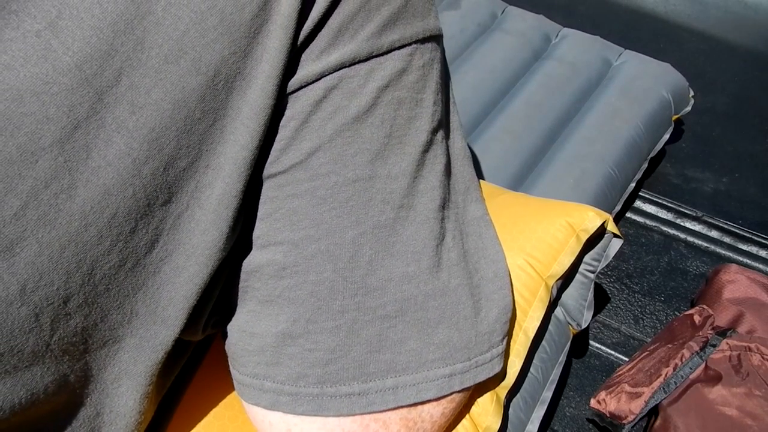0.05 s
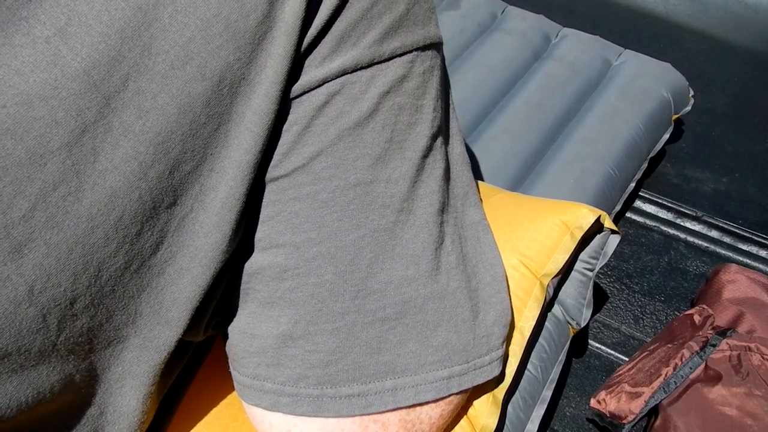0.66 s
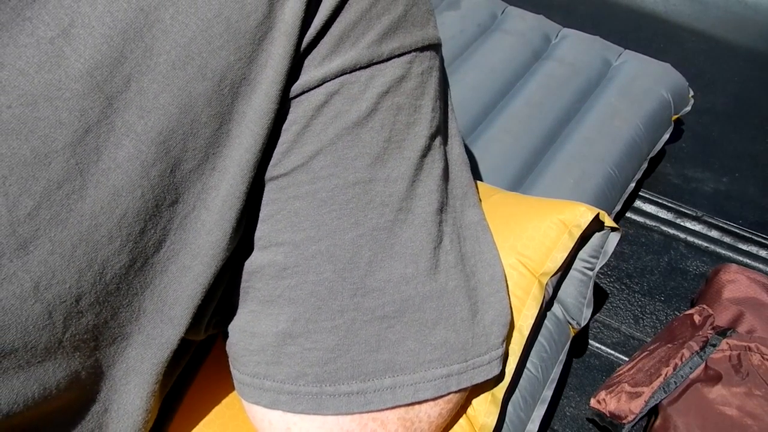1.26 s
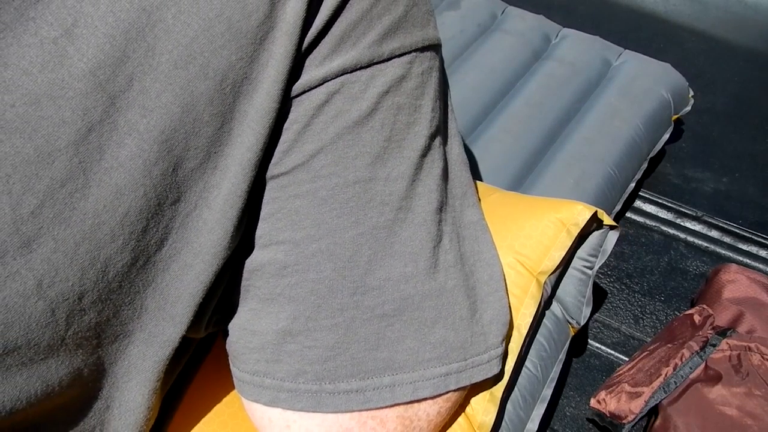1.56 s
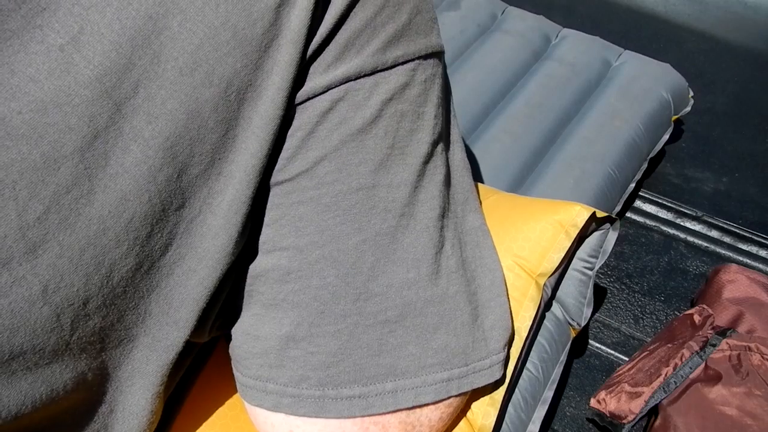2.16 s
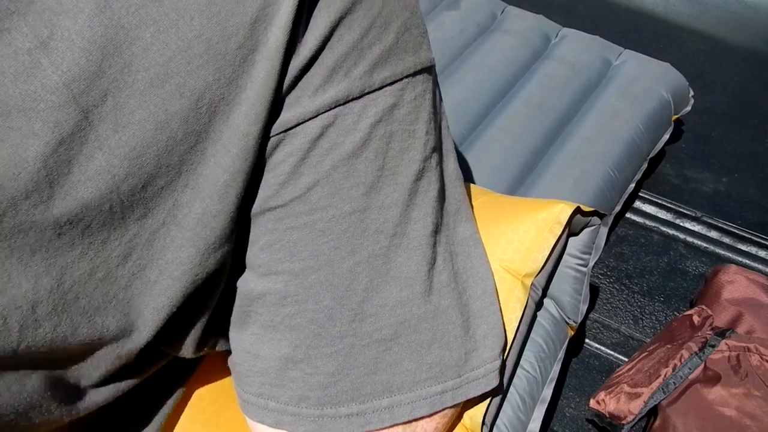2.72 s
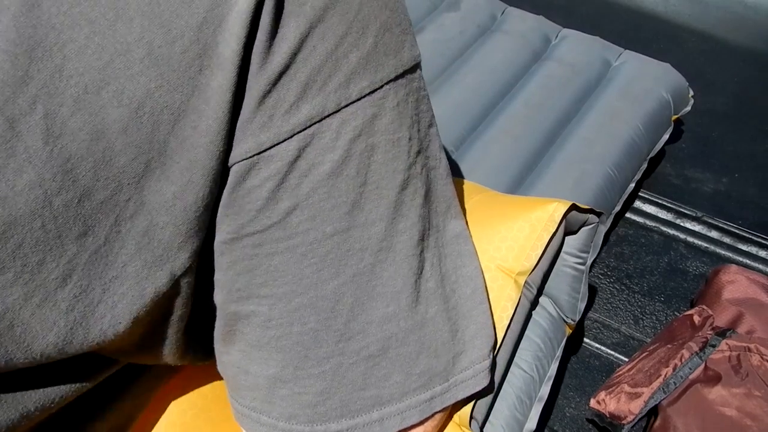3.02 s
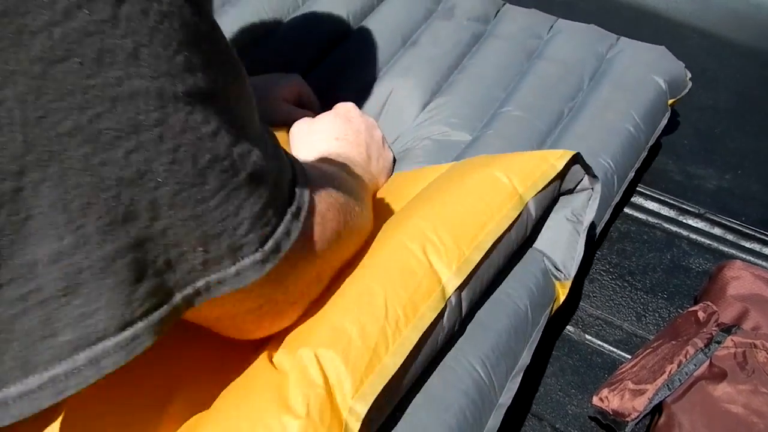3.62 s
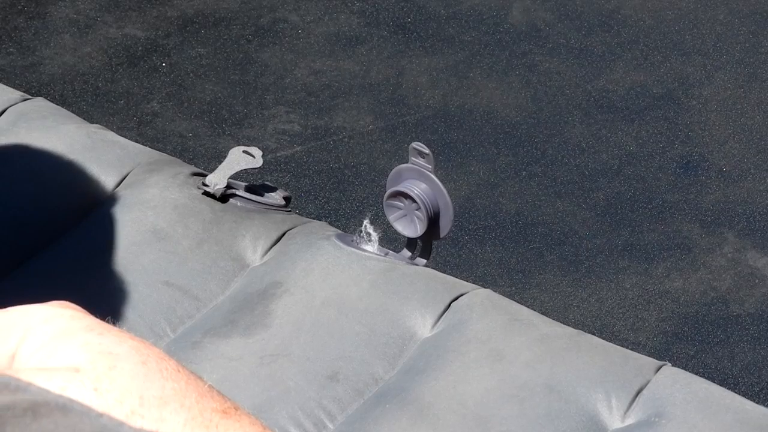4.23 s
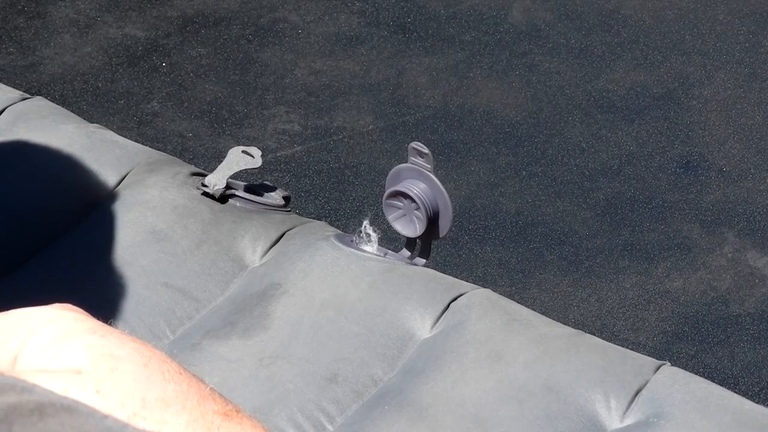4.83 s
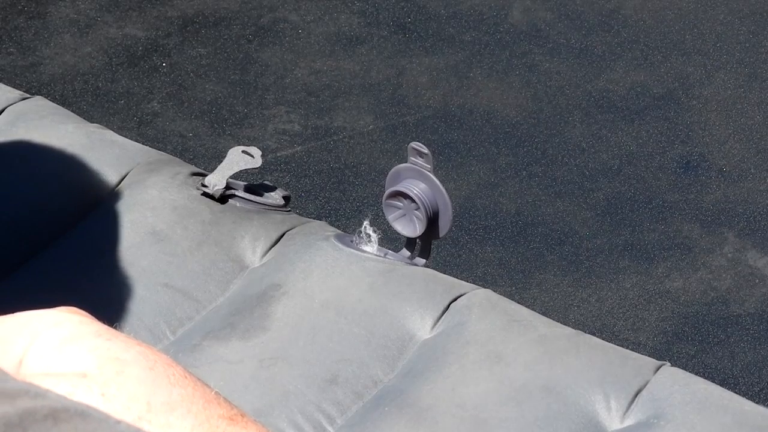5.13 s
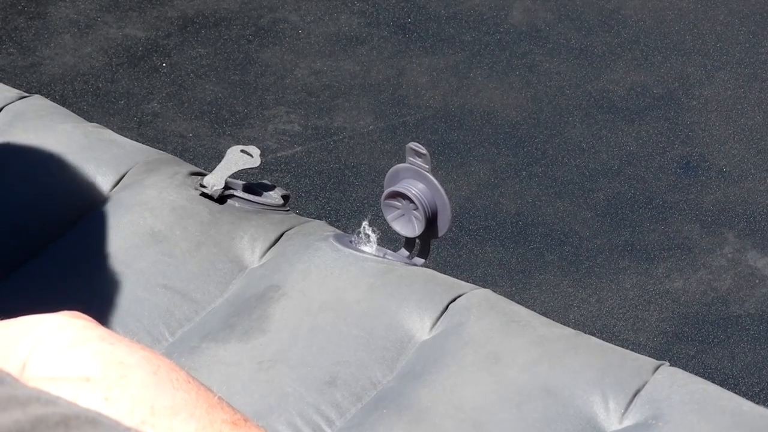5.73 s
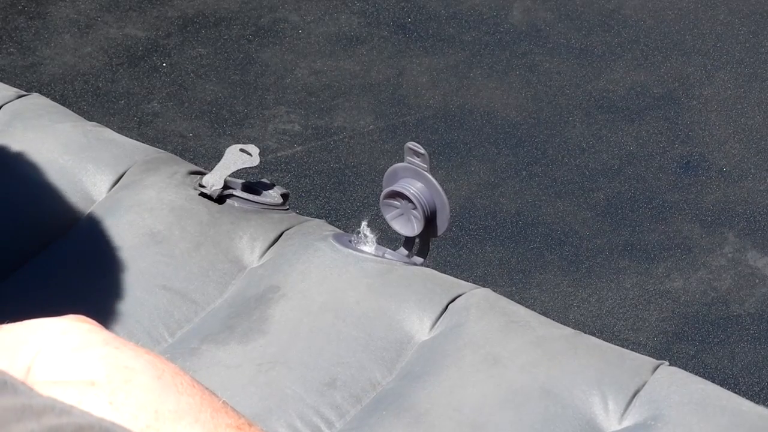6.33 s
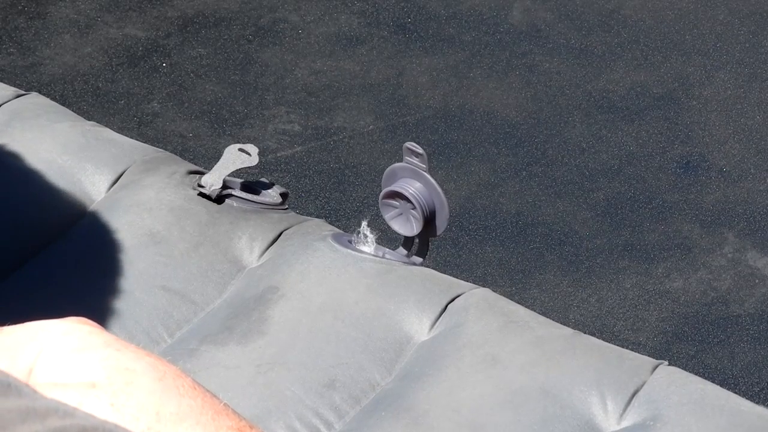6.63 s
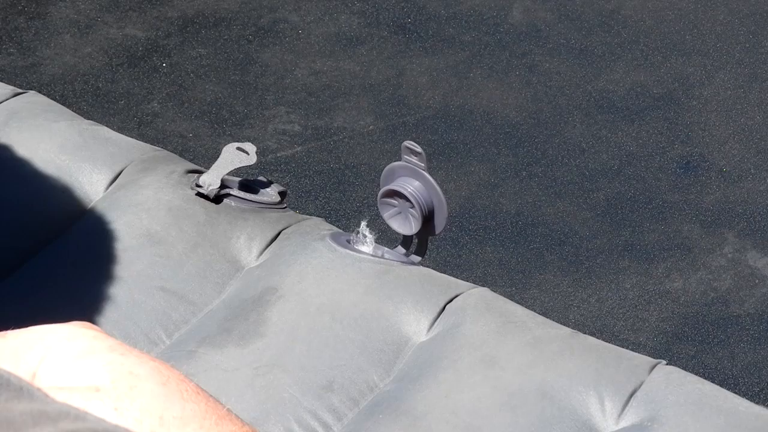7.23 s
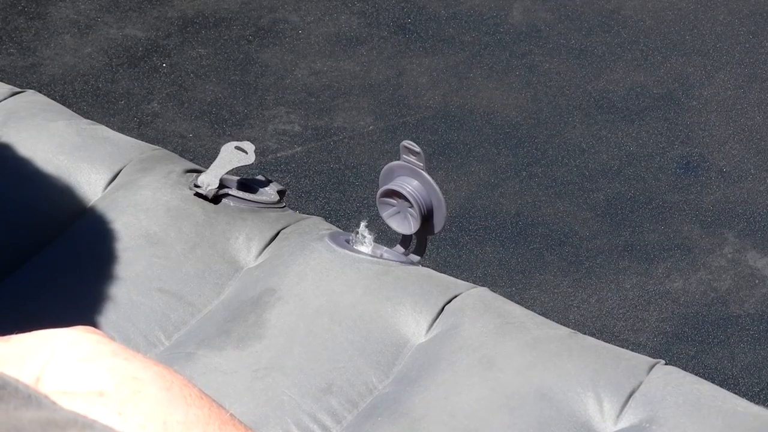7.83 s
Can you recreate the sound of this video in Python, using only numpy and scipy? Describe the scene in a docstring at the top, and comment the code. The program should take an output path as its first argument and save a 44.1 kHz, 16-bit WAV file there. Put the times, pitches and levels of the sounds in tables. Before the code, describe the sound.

Heard from behind a person leaning on a sleeping pad in an open truck bed, escaping air makes a bright hiss above a low rumble. Clothing rubs and several knocks land on the taut pad as the weight lifts and the hiss falls away. The sound cuts out briefly, then resumes close to the valve: a slowly fading rush of air with a faint breathy whistle and occasional soft thumps.

```python
"""Air hisses from the open valve of a sleeping pad that someone leans on in a truck bed.
Folds give way softly and the pad booms briefly over a low outdoor rumble. The person shifts:
cloth rubs, the nylon skin crackles, the pad is knocked, and the hiss drops as the weight lifts.
After a short silence the turbulent jet is heard from beside the valve, with a faint whistle
at the rim, weakening as the pad empties."""
import sys
import numpy as np
from scipy import signal
from scipy.fft import rfft, irfft
from scipy.io import wavfile
from scipy.ndimage import uniform_filter1d

SR = 44100
rng = np.random.default_rng(int(sys.argv[2]) if len(sys.argv) > 2 else 0)


def store_pcm(level_fs):
    """Save levels as 16-bit WAV."""
    pcm = np.round(np.clip(level_fs, -1, 1) * 32767).astype(np.int16)
    wavfile.write(sys.argv[1], SR, np.atleast_2d(pcm).T)


N = 351477
TIME = np.arange(N) / SR
HZ = np.fft.rfftfreq(N, 1 / SR)
GAP_START_S, GAP_END_S = 3.885, 4.065

# spectrum of the rubs and thumps, with a boxy ring near 400 Hz: (frequency [Hz], relative level [dB])
RUB_THUMP_COLOUR = [(29, -49), (50, -19), (147, -9), (282, -15.5), (360, -3.5), (440, -1.5), (814, -10.5),
                    (1950, -12.5), (3830, -21), (4410, -21), (4790, -24.5), (5990, -30.5), (6500, -28),
                    (8450, -62), (14300, -120)]


def gain_of(db):
    """Decibels to amplitude."""
    return 10 ** (np.asarray(db) / 20)


def unit_rms(x):
    """Scale to unit rms."""
    return x / np.sqrt(np.mean(x ** 2) + 1e-20)


def curve(points, hz=HZ):
    """Interpolate on a log-frequency axis."""
    f, value = np.transpose(points)
    return np.interp(np.log(hz + 1), np.log(f + 1), value)


def add(mix, start_s, sound):
    """Mix a sound in at start_s."""
    part = mix[..., max(round(start_s * SR), 0):][..., :sound.shape[-1]]
    part += sound[..., :part.shape[-1]]


def ramp(start_s, length_s):
    """Smooth step from 0 to 1."""
    return np.sin(np.pi / 2 * np.clip((TIME - start_s) / length_s, 0, 1)) ** 2


def bump(centre_s, half_s):
    """Gaussian swell to 1 and back."""
    return np.exp(-((TIME - centre_s) / half_s) ** 2)


def wander(rate_hz):
    """Low-passed random motion, unit rms."""
    return unit_rms(irfft(rfft(rng.standard_normal(N)) / (1 + (HZ / rate_hz) ** 2), N))


def noise_pair(coherence):
    """Left and right spectra of partly coherent noise."""
    a, b = rfft(rng.standard_normal((2, N)))
    shared, apart = np.sqrt((1 + coherence) / 2) * a, np.sqrt((1 - coherence) / 2) * b
    return np.array([shared + apart, shared - apart])


def truck_bed(wall_s, wall_db, ribs_db, ribs_decay_s):
    """Frequency response of the bed: a side-wall echo and scatter from the ribs comb the hiss."""
    late_s = TIME - wall_s
    scatter = rng.standard_normal(N) * np.exp(-abs(late_s) / ribs_decay_s) * (late_s > 0)
    wall = gain_of(wall_db) * np.exp(-2j * np.pi * HZ * wall_s)
    return 1 + wall + gain_of(ribs_db) * rfft(scatter / np.linalg.norm(scatter))


def eddies(hiss, depth_db=1.13, size=1024):
    """Eddies swell and fade patches of the hiss a few hundred hertz wide."""
    frames = signal.stft(hiss, nperseg=size)[2]
    patches = uniform_filter1d(rng.standard_normal(frames.shape[1:]), size=11, axis=1)
    patches = uniform_filter1d(patches, size=7, axis=0)
    return signal.istft(frames * gain_of(depth_db * unit_rms(patches)), nperseg=size)[1][:, :N]


def jet(level_db, colour, rings, coherence, balance, bed, brightening, flutter_db, level_above_hz):
    """Turbulence at the valve; the treble follows the flow more steeply than the body does."""
    # phase between channels: (frequency [Hz], left lead [rad])
    lead = [(3500, 0.64), (5000, 0.18), (6300, 0.67), (6800, -0.51), (8500, -1.7), (10500, -0.89),
            (11800, -.8), (12700, .4), (13800, 0)]
    side = np.array([[.5], [-.5]])
    spectrum = noise_pair(curve(coherence)) * gain_of(side * curve(balance))
    spectrum *= np.exp(1j * side * curve(lead) * (HZ > lead[0][0]))
    spectrum /= np.sqrt(uniform_filter1d(abs(spectrum.mean(0)) ** 2, size=2001))  # flatten the mid
    rings_db = sum(db / (1 + (2 * (HZ - hz) / width_hz) ** 2) for hz, width_hz, db in rings)
    spectrum *= bed * gain_of(curve(colour) + rings_db)
    spectrum /= np.std(irfft(spectrum.mean(0) * (HZ > level_above_hz), N))
    highpass = 1 / (1 + (5000 / (HZ + 1)) ** 4)
    body_db = brightening * (-32.5 - level_db)  # no tilt at -32.5 dB
    body = irfft(spectrum * (1 - highpass), N) * gain_of(body_db + flutter_db * wander(25))
    fizz = irfft(spectrum * highpass, N) * gain_of(flutter_db * wander(40))
    return eddies((body + fizz) * gain_of(level_db))


def jet_behind():
    """Jet from behind the person: surges as they push off, drops as their weight lifts."""
    # hiss spectrum: (frequency [Hz], relative level [dB])
    colour = [(350, -63), (600, -15), (1470, -15.5), (1700, -10), (1960, -11.5), (2120, -9), (2400, -12),
              (3780, -11.5), (4220, -13), (5480, -8.5), (7110, -13.5), (9760, -2.5), (11800, -11.5),
              (13600, -13), (16000, -25)]
    # resonances: (frequency [Hz], width [Hz], gain [dB])
    rings = [(2650, 280, 3), (5400, 100, 3.5), (9560, 300, 1.5)]
    # channel likeness: (frequency [Hz], coherence [0-1])
    coherence = [(600, 0.64), (2800, 1), (3600, 0.98), (4000, 0.48), (5200, .72), (6700, .2), (8000, 0.27),
                 (9600, .72), (11500, .55), (12300, .4), (14400, 0.46), (15400, .8)]
    # channel balance: (frequency [Hz], left minus right [dB])
    balance = [(1000, -.3), (3200, -0.7), (4000, -1.5), (5400, 0), (6600, -7.5), (8200, -2.5), (9700, -4.5),
               (10700, 2), (12100, 1.5), (13100, 2), (14800, -2.5)]
    push_db, lift_db = 1.8 * bump(2.88, .1), -14 * ramp(3.093, .2)
    fade_db = -120 * (np.clip(TIME, 3.79, GAP_END_S) - 3.79)  # fades out just before the short silence
    bed = truck_bed(wall_s=.00923, wall_db=-19, ribs_db=-13.5, ribs_decay_s=.0019)
    return jet(-28 + push_db + lift_db + fade_db, colour, rings, coherence, balance, bed,
               brightening=.32, flutter_db=.46, level_above_hz=8350)


def rumble(start_db=-46, ease_db_per_s=.4, lumps_db=2):
    """Lumpy outdoor rumble, slowly easing, less coherent in the deep bass."""
    # rumble spectrum: (frequency [Hz], relative level [dB])
    colour = [(15, -47), (25, -15.5), (49, -14.5), (70, -10), (102, -1.5), (140, -9), (185, -7.5),
              (244, -13.5), (275, -10), (307, -13.5), (347, -2.5), (432, -1.5), (475, -3.5), (650, -12),
              (840, -38.5), (1430, -120)]
    coherence = curve([(30, .35), (100, .55), (400, .63)])
    noise = irfft(noise_pair(coherence) * gain_of(curve(colour)), N)
    return unit_rms(noise) * gain_of(start_db - ease_db_per_s * TIME + lumps_db * wander(16))


def thumps(events, crumple_s, bass_db_per_oct, push_db, tail_db, tail_s, muffle_hz, size=4096):
    """Each crumple swells to a push and dies with a boxy ring."""
    mix = np.zeros((2, N))
    t, hz = np.arange(size) / SR, abs(np.fft.fftfreq(size, 1 / SR))
    octave = np.log2((hz + 20) / 500)
    swell = t / crumple_s * np.exp(-t / crumple_s)
    push = gain_of(push_db) * (swell == swell.max())
    for start_s, db, treble_db_per_oct in events:
        grit, mid, side = rng.standard_normal((3, size))
        crumple = grit * swell
        tail = np.array([mid + .17 * side, mid - .17 * side]) * np.exp(-t / tail_s)
        tail *= gain_of(tail_db) / np.linalg.norm(tail[0])
        force = crumple / np.linalg.norm(crumple) + push + tail
        tilt_db = treble_db_per_oct * np.clip(octave, 0, 3) + bass_db_per_oct * np.clip(-octave, 0, 2.5)
        colour = gain_of(np.maximum(curve(RUB_THUMP_COLOUR, hz) + tilt_db, -90))
        colour /= np.sqrt(1 + (hz / muffle_hz) ** 6)
        ring = np.fft.fft(force) * np.exp(np.conj(signal.hilbert(np.log(colour))))  # minimum phase
        midband = np.fft.ifft(ring[0] * (hz > 250) * (hz < 3000))
        midband_rms = np.linalg.norm(midband) / np.sqrt(.0035 * SR)  # as if packed into 3.5 ms
        add(mix, start_s, gain_of(db) * np.fft.ifft(ring).real / midband_rms)
    return mix


def folds():
    """Folds of the pad give way softly."""
    # folds: (time [s], level [dB], treble tilt [dB/octave])
    events = [(.133, -26, -9), (.237, -31.5, -1), (.457, -32.5, 1.5), (.651, -31, -.5), (.845, -32, -5),
              (1.041, -29.5, -2.5), (1.314, -31.5, -4), (1.475, -30.3, -4), (1.566, -32, -4),
              (2.312, -29, -9), (2.892, -24.5, 0), (2.923, -22.5, 4), (4.432, -25.5, -7), (4.682, -32, -8),
              (4.942, -24.5, -1.5), (4.972, -32, -4), (5.714, -26, 2), (6.802, -27.5, 2),
              (7.372, -31.5, -4)]
    return thumps(events, crumple_s=.00395, bass_db_per_oct=1.3, push_db=-8,
                  tail_db=-6.5, tail_s=.037, muffle_hz=2200)


def drones(ring_hz=104, width_hz=36):
    """The pad booms at its lowest resonance as weight rolls on it."""
    # booms: (time [s], length [s], level [dB])
    booms = [(.22, 0.26, -46), (1.66, 0.059, -54), (3.713, .045, -34), (4.072, .1, -47.5),
             (4.46, .054, -45), (6.48, .091, -49), (7.338, 0.23, -49.5)]
    envelope = np.zeros(N)
    for start_s, length_s, db in booms:
        add(envelope, start_s, gain_of(db) * signal.windows.tukey(int(length_s * SR), .5))
    ring = irfft(noise_pair(.62) / (1 + (2 * (HZ - ring_hz) / width_hz) ** 2), N)
    return unit_rms(ring) * envelope


def cloth_strokes(rise_share=.33, fall_share=.41):
    """Body and treble gains of sliding cloth: pressure sets the level, speed lifts the treble."""
    # strokes: (time [s], length [s], level [dB], treble lift [dB])
    strokes = [(2.591, 0.52, -35, 2), (3.043, 0.44, -33.5, 1.5), (3.302, 0.46, -30, 3.2),
               (3.646, .29, -35, 0), (6.267, 0.073, -43.5, 10), (7.342, 0.15, -43, -1)]
    body_gain, treble_gain = np.zeros((2, N))
    for start_s, length_s, db, lift_db in strokes:
        fall_s = fall_share * length_s
        release = 1 - ramp(start_s + length_s - fall_s, fall_s)
        stroke = gain_of(db) * ramp(start_s, rise_share * length_s) * release
        body_gain += stroke
        treble_gain += stroke * gain_of(lift_db)
    return body_gain, treble_gain


def rubbing(body_gain, treble_gain, grain_db=2.5, clump_db=1):
    """Cloth slides over the pad in clumps of tiny slips."""
    coherence = curve([(100, .82), (500, .97), (2500, .92), (6000, .37)])
    slips = irfft(noise_pair(coherence), N)
    slips *= gain_of(grain_db * wander(600) + clump_db * wander(30))
    spectrum = rfft(slips) * gain_of(curve(RUB_THUMP_COLOUR))
    spectrum /= np.std(irfft(spectrum * (HZ > 250) * (HZ < 1400), N))
    highpass = 1 / (1 + (1000 / (HZ + 1)) ** 4)
    return irfft(spectrum * (1 - highpass), N) * body_gain + irfft(spectrum * highpass, N) * treble_gain


def crackle(treble_gain, fizz_db=-8, grain_db=4, tick_s=.00066, low_hz=4500, high_hz=10500):
    """The nylon skin fizzes under the sliding cloth and gives a few sharp ticks."""
    # ticks: (time [s], peak before the band-pass [dB])
    ticks = [(2.980, -8), (3.007, -11), (3.047, -18), (3.404, -16), (3.633, -8)]
    grains = irfft(noise_pair(.43), N) * gain_of(grain_db * wander(900))
    skin = unit_rms(grains) * treble_gain * gain_of(fizz_db)
    for start_s, db in ticks:
        mid, side = rng.standard_normal((2, 256)) * np.exp(-TIME[:256] / tick_s)
        add(skin, start_s, gain_of(db) * np.array([mid + .5 * side, mid - .5 * side]) / abs(mid).max())
    bandpass = 1 / np.sqrt((1 + (low_hz / (HZ + 1)) ** 2) * (1 + (HZ / high_hz) ** 10))
    return irfft(rfft(skin) * bandpass, N)


def knocks():
    """Hard knocks on the taut pad as the person shifts."""
    # knocks: (time [s], level [dB], treble tilt [dB/octave])
    events = [(3.183, -14, 2), (3.282, -15, -4.5), (3.361, -18.5, -12), (3.517, -21.5, -11),
              (3.544, -30, -9.5), (3.7265, -16.5, 2)]
    return thumps(events, crumple_s=.0015, bass_db_per_oct=-.8, push_db=-3,
                  tail_db=-4, tail_s=.032, muffle_hz=1800)


def jet_beside(start_db=-29, fall_db_per_s=1.33):
    """Jet from beside the valve, weakening as the pad's pressure runs down."""
    # hiss spectrum: (frequency [Hz], relative level [dB])
    colour = [(350, -20.5), (600, -8), (790, -7), (1050, -3.5), (1290, -4.5), (1830, -1), (2720, 0),
              (3250, -7), (4160, 0), (6370, -5), (8740, -7), (10200, -4), (12200, -15), (13000, -6.5),
              (13800, -6.5), (16000, -21)]
    # resonances and dips: (frequency [Hz], width [Hz], gain [dB])
    rings = [(1840, 120, 2.5), (2120, 78, -2.5), (2820, 44, -2), (2940, 66, -4), (3096, 60, 4),
             (8680, 690, 5.5)]
    # channel likeness: (frequency [Hz], coherence [0-1])
    coherence = [(600, .75), (1900, 0.94), (3300, 0.94), (3800, 0.85), (5500, 0.74), (6400, 0.53),
                 (8600, 0.56), (9600, .28), (11000, .35), (12100, .12), (13200, 0.54), (15400, .8)]
    # channel balance: (frequency [Hz], left minus right [dB])
    balance = [(1000, 0), (4000, -1.4), (5600, 2), (6500, -3.5), (7500, -1), (8700, -2.5), (9600, 2),
               (11000, 3.3), (12050, 8), (12900, -5), (14000, 0.5), (14900, 3)]
    level_db = start_db - fall_db_per_s * np.maximum(TIME - GAP_END_S, 0)
    bed = truck_bed(wall_s=.01016, wall_db=-16, ribs_db=-9.5, ribs_decay_s=.0016)
    return jet(level_db, colour, rings, coherence, balance, bed,
               brightening=.23, flutter_db=.43, level_above_hz=2730)


def whistle(pitch_hz=1139, width_hz=70, base_db=-55, swell_db_per_hz=.0453):
    """Breathy edge tone at the valve rim, louder as its pitch sags."""
    # pitch sags: (time [s], half length [s], depth [Hz])
    sags = [(6.05, 0.23, 124), (6.74, 0.2, 130), (7.95, .26, 165)]
    sag_hz = sum(depth_hz * bump(centre_s, half_s) for centre_s, half_s, depth_hz in sags)
    phase = 2 * np.pi * np.cumsum(pitch_hz - sag_hz) / SR
    tone = wander(width_hz) * np.cos(phase) + wander(width_hz) * np.sin(phase)
    return unit_rms(tone) * gain_of(base_db + swell_db_per_hz * sag_hz)


def scene():
    """The pad from behind the person, then from beside the valve."""
    air = np.where(TIME < GAP_START_S, jet_behind(), jet_beside() + whistle())
    body_gain, treble_gain = cloth_strokes()
    cloth = rubbing(body_gain, treble_gain) + crackle(treble_gain)
    return air + rumble() + folds() + drones() + cloth + knocks()


def record(dry):
    """Short silence between the two positions, then a low-pass."""
    gate = np.clip((GAP_START_S - TIME) / .005, 0, 1) + np.clip((TIME - GAP_END_S) / .001, 0, 1)
    lowpass = signal.firwin(255, 15850, window=("kaiser", 9), fs=SR)
    return signal.oaconvolve(dry * gate, lowpass[None], "same")


dry = scene()
out = record(dry)
store_pcm(out)
```